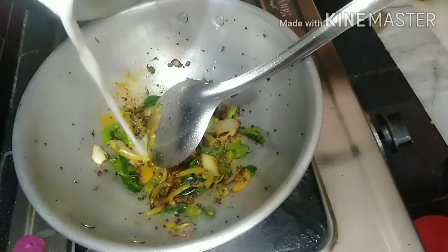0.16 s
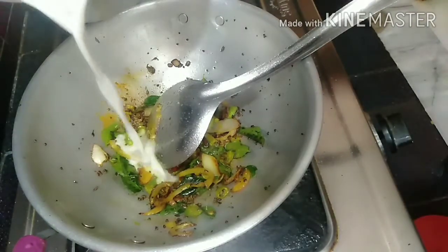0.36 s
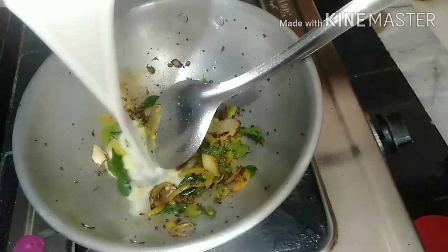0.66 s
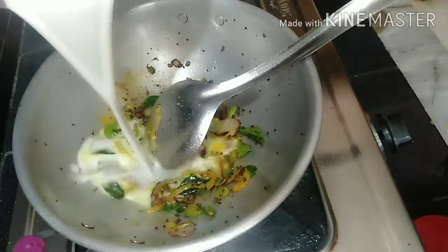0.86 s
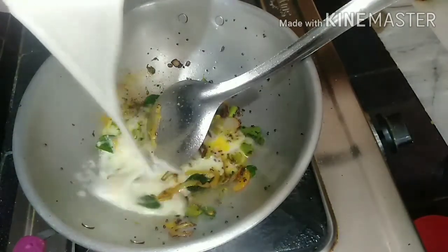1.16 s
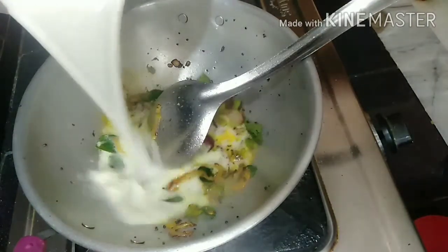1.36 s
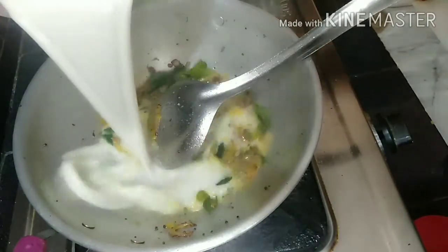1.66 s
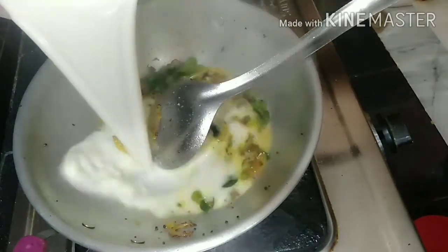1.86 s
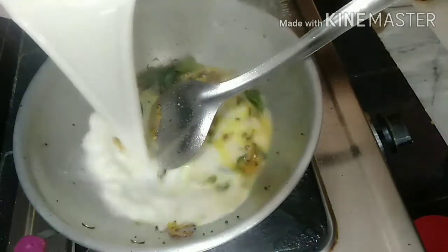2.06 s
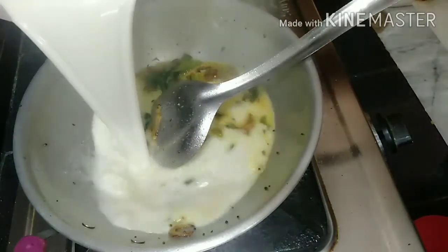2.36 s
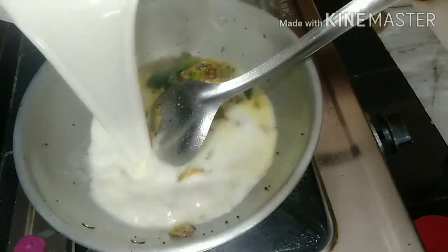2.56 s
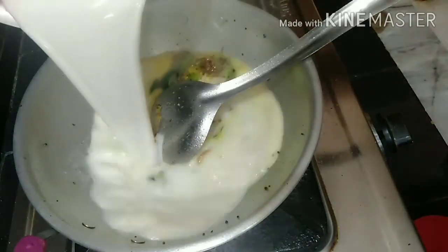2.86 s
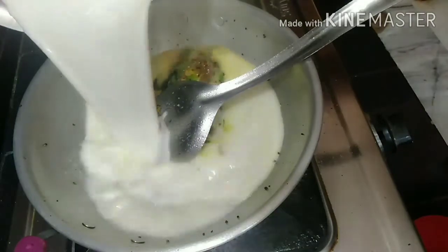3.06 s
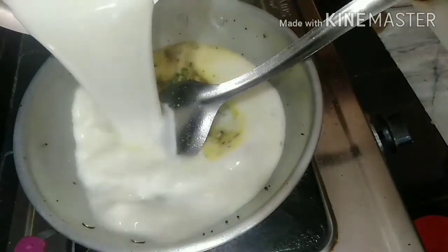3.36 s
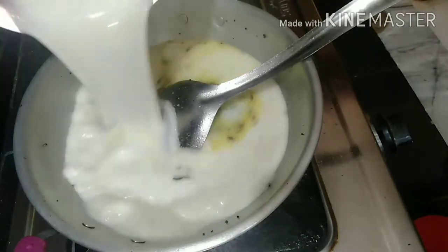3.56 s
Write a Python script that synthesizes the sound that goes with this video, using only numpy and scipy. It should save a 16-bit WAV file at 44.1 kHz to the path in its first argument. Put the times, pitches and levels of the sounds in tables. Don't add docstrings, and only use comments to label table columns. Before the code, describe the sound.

A sharp steamy hiss bursts up in a metal pan, gurgles, then fades into spitting drops

```python
import sys
import numpy as np
from scipy import signal
from scipy.fft import rfft, irfft
from scipy.io import wavfile
from scipy.ndimage import uniform_filter1d

SR = 44100
rng = np.random.default_rng(int(sys.argv[2]) if len(sys.argv) > 2 else 0)


def boost_factor(decibels):
    exponent = np.asarray(decibels, float) / 20
    return 10 ** exponent


def transcribe(signal):
    frames = np.atleast_2d(signal).T
    limited = np.clip(frames, -1, 1)
    pcm = np.round(limited * 32767).astype(np.int16)
    wavfile.write(sys.argv[1], SR, pcm)


N = 163170


def walk(rate_hz):
    hold = int(SR / rate_hz)
    steps = np.repeat(rng.standard_normal(N // hold + 1), hold)
    return 0.64 * uniform_filter1d(uniform_filter1d(steps, hold), hold)[:N]


def unit(x):
    return x / np.sqrt(np.mean(x ** 2))


def swell(t, centre_s, length_s):
    return np.exp(-2 * ((t - centre_s) / length_s) ** 2)


def colour(x, spectrum, rings=()):
    size = 4096
    f = np.maximum(np.arange(size // 2 + 1) * SR / size, 1.)
    hz, level_db = np.array(spectrum).T
    db = np.interp(np.log(f), np.log(hz), level_db)
    for ring_hz, width_hz, lift_db in rings:
        db = db + lift_db / (1 + (2 * (f - ring_hz) / width_hz) ** 2)
    cepstrum = irfft(np.log(boost_factor(db)))
    fold = np.r_[1, 2 * np.ones(size // 2 - 1), 1, np.zeros(size // 2 - 1)]
    h = irfft(np.exp(rfft(cepstrum * fold)))
    return signal.fftconvolve(x, h / np.sqrt(np.sum(h ** 2)))[:N]


# (frequency [Hz], density [dB per Hz])
ROAR = [(25, -6.5), (55, -18.5), (150, -10), (280, -20), (420, -11.5), (650, -6.5), (1100, -18),
        (4000, -33.5)]


def burner_roar(t):
    level_db = -59.5 + walk(6.6) - .5 * t
    humps = [(659.5, 38, 6.2), (594, 72, 0.67), (110, 20, 6.2)]  # Hz, width Hz, lift dB
    return boost_factor(level_db) * colour(rng.standard_normal(N), ROAR, humps)


# (time [s], frequency [Hz], length [s], level [dB])
DRONES = [(0, 100, .15, -64), (0.327, 100, 0.22, -66.5), (0.597, 100, 0.079, -71), (.8, 100, 0.23, -73),
          (1.486, 100.6, .3, -64), (1.9, 100, 0.13, -72), (2.398, 101.2, 0.22, -61),
          (2.692, 98, 0.046, -65), (0.157, 122.4, 0.36, -66.5), (0.577, 121, 0.085, -66),
          (.85, 118.9, 0.28, -68.5), (1.206, 118, 0.081, -65), (1.646, 120.5, 0.19, -68.5),
          (2.398, 120.2, 0.14, -65), (3.3, 126.2, 0.22, -67), (3.494, 118.7, 0.25, -64.5)]


def motor_drones(t):
    out = np.zeros(N)
    for s, hz, length_s, db in DRONES:
        phase = 2 * np.pi * np.cumsum(hz * (1 + 0.014 * walk(24))) / SR
        out += boost_factor(db + 1.5) * swell(t, s, length_s) * np.sin(phase)
    return out


def mode(t, hz, width_hz, curve):
    pole = np.exp((2j * np.pi * hz - np.pi * width_hz) / SR)
    ring = signal.lfilter([1], [1, -pole], rng.standard_normal(N)).imag
    return unit(ring) * boost_factor(np.interp(t, *np.array(curve).T))


# (time [s], level [dB])
FLAME = [(0, -74), (.18, -67), (.3, -70), (.45, -65), (.6, -70), (1.0, -69), (1.5, -70), (1.8, -80),
         (3.7, -80)]


def flame_note(t):
    return mode(t, 665, 45, FLAME)


# (time [s], level [dB])
WALL = [(.3, -95), (.9, -75), (1.3, -72), (1.7, -69), (2.6, -69), (3.0, -74), (3.2, -88)]


def wall_mode(t):
    return mode(t, 986, 14, WALL)


# (time [s], peak level [dB], ring frequency [Hz])
CRACKS = [(.1752, -50, 4300), (3.1375, -39, 2600), (3.138, -40, 4600), (3.1385, -43, 1700),
          (3.197, -43, 2900), (3.2209, -43, 3000), (3.239, -43, 4800), (3.2793, -39, 2900),
          (3.3317, -42, 3000), (3.3896, -42, 2400), (3.4135, -41, 3000), (3.4444, -45, 2100),
          (3.4725, -42, 3000), (3.4735, -46, 4400), (3.5, -41, 3100), (3.501, -42, 4700),
          (3.512, -46, 2000), (3.5535, -45, 3200), (3.5608, -39, 2800), (3.5612, -43, 4500),
          (3.568, -45, 1650), (3.577, -44, 2900), (3.581, -45, 3100)]


def cracks():
    t60_s = .01
    k = np.arange(int(2 * t60_s * SR)) / SR
    rings, clicks = np.zeros((2, N + len(k)))
    for s, db, hz in CRACKS:
        i = int(s * SR)
        decay = boost_factor(db - 4 - 60 * k / t60_s)
        rings[i:i + len(k)] += decay * np.sin(2 * np.pi * hz * k * (1 + 8 * k))
        clicks[i] = boost_factor(db + 4)
    return rings[:N] + colour(clicks[:N], [(700, -20), (1500, 0), (5000, 0), (7000, -15)])


# (time [s], peak level [dB], airy share [dB], flurry length [ms])
SPITS = [(.0088, -40, -2, 1.5), (.1751, -33, 3, 1.3), (.2033, -33, 5, 2), (.216, -31, 5, 2),
         (.2243, -33, 4, 4), (2.822, -28, 0, 3), (2.836, -25, 2, .8), (2.895, -27, 2, 1),
         (2.958, -29, 2, 1), (3.103, -33, 3, 3), (3.123, -27, 2, 2), (3.1375, -23, -1, 1),
         (3.157, -31, 3, 4), (3.226, -33, 3, 3), (3.239, -31, 2, 3), (3.26, -32, 3, 2), (3.28, -28, 0, 1),
         (3.333, -32, -2, 1), (3.39, -26, 2, 1.5), (3.4127, -31, 2, 1.2), (3.4145, -32, 0, 1.2),
         (3.43, -34, 8, 1), (3.434, -32, 0, 1), (3.4452, -36, 0, 3), (3.4485, -34, 0, 1.5),
         (3.473, -31, 0, 2), (3.5003, -31, -5, 3), (3.511, -35, 2, 1.5), (3.5145, -33, 0, 4),
         (3.554, -32, 2, .4), (3.561, -35, -10, 2), (3.581, -39, -5, 2), (3.618, -35, 9, 1.5)]
# (frequency [Hz], density [dB per Hz])
CRACK = [(500, -28), (1200, -14), (2800, 4), (5000, -7), (6500, -40), (9000, 21)]


def spits():
    low_db, after_db, gain_db = -7, -5, 2
    k = np.arange(int(0.016 * SR)) / SR
    drive = np.zeros((3, N + len(k)))
    for s, db, air_db, ms in SPITS:
        grain, chance = rng.standard_normal((2, len(k)))
        sparse = 0.21 + (chance > 1.7)
        spray = boost_factor(after_db) * np.clip(grain, -1.5, 1.5) * sparse * np.exp(-k * 1000 / ms)
        spray[0] = 1
        share = boost_factor(np.array([[low_db - air_db], [0], [air_db - 4.5]]))
        share = share / np.sqrt(np.mean(share ** 2))
        i = int(s * SR)
        drive[:, i:i + len(k)] += spray * boost_factor(db + gain_db) * share
    low, body, air = drive[:, :N]
    return colour(low, CRACK, RINGS) + colour(body, BODY, RINGS) + colour(air, AIR)


def bursts(rate_per_s, spread_db):
    hot, cool, cools_s, biggest = 0.71, .45, 2.9, 3.9
    chance, sign, size = rng.random((3, N))
    cooling = 1 / (1 + np.exp((cools_s - np.arange(N) / SR) / 0.49))
    hiss = np.clip(hot + (cool - hot) * cooling, 0, 1)
    heights = boost_factor(np.minimum(-np.log(size + 1e-9), biggest) * spread_db)
    pops = (chance < rate_per_s / SR) * np.sign(sign - .5) * heights
    return np.sqrt(1 - hiss) * unit(pops) + np.sqrt(hiss) * rng.standard_normal(N)


def own_flutter():
    return 0.43 * (0.2 * walk(11) + walk(60))


# (time [s], gain [dB], length [s])
SWELLS = [
    (0.623, -1.5, .05),
    (1.0, -0.5, .06),
    (1.197, 0, .15),
    (1.457, 4, 0.026),
    (1.603, 0, .05),
    (2.13, -1, 0.086),
    (3.57, 5, 0.023),
]
# (frequency [Hz], density [dB per Hz])
GURGLE = [(400, -24.5), (700, -7.5), (1200, -13.5), (1550, -7), (2200, -8.5), (3000, -5.5), (4200, -8.5),
          (6000, -27.5)]
# (frequency [Hz], width [Hz], lift [dB])
SHALLOW = [(1960, 350, 3.5), (1630, 150, 2.5), (2700, 460, 0), (726, 180, -1.5)]
DEEP = [(887, 22, 5), (1090, 180, -5), (2360, 270, 3), (1990, 200, -4)]


def gurgle(t, level_db, share_db, full):
    share_db = share_db + sum(db * swell(t, s, length_s) for s, db, length_s in SWELLS)
    bubbles = bursts(2000, 3) * boost_factor(level_db + share_db + own_flutter())
    shallow = colour(bubbles * (1 - full), GURGLE, RINGS + SHALLOW)
    return shallow + colour(bubbles * full, GURGLE, RINGS + DEEP)


# (time [s], level [dB], brightness [dB], bubble share [dB])
BOIL = [(0, -60, -13, -4), (.176, -62, -3, -6.5), (.197, -59, -3, -6), (.203, -49.5, 3, -28),
        (.235, -46, 1.5, -30), (.262, -48, -6, -22), (.32, -51, -12, -9.5), (.4, -45.5, -4, -11.5),
        (.48, -39, -6, -12), (.6, -37, -6, -14), (.9, -36, -6, -11.5), (1.2, -36.5, -2, -7),
        (1.6, -36.5, -4, -9.5), (2.1, -39, -3, -8.5), (2.5, -42, -1, -9.5), (2.8, -41.5, -3.5, -11),
        (3.0, -47, -3, -10), (3.2, -49, -3, -10), (3.55, -55, -9, -6.5), (3.7, -59, 3, -13)]
# (time [s], gain [dB], length [s])
SURGES = [(0.543, -1.5, .02), (0.567, 2, 0.016), (.62, 2.5, 0.031), (0.683, -1.5, 0.022),
          (0.873, 0.5, 0.047), (0.958, 1.5, 0.032), (1.117, -2, 0.052), (1.212, 0.5, 0.052),
          (1.405, -1.5, 0.035), (1.454, 0.5, 0.013), (1.595, 2, 0.049), (1.668, -2, 0.065),
          (1.757, 0.5, 0.025), (1.835, -1.5, 0.027), (1.882, 1.5, .03), (1.995, -7, 0.009),
          (2.117, 2, 0.073), (2.193, -2, 0.015), (2.338, 2, 0.044), (2.41, -0.5, .03), (2.582, 1, 0.11),
          (2.67, -1.5, 0.034), (2.835, 1.5, 0.019), (2.86, -3.5, 0.035), (3.056, 1.5, 0.052),
          (3.132, 3.5, 0.014), (3.18, -2, 0.05), (3.25, 0.5, 0.036), (3.352, 0, 0.023), (3.572, 2, 0.024)]
# (frequency [Hz], density [dB per Hz])
BODY = [(500, -38.5), (1200, -27.5), (3500, -19), (5600, -14.5), (6300, -7), (7700, -3.5), (8600, -9.5),
        (11000, -14)]
AIR = [(5000, -33), (8500, -7.5), (10800, -9.5), (12000, -4), (13500, -6), (14600, 4), (15450, 5.5),
       (16000, -5.5)]
# (frequency [Hz], width [Hz], lift [dB])
RINGS = [(1690, 180, 3.5), (1930, 240, 5), (2260, 200, -2.5), (2620, 300, 3.5), (3250, 140, -4),
         (3780, 300, -6.5), (4150, 250, 2), (5350, 200, 2), (5950, 200, -3), (6400, 300, 2), (6800, 300, 3),
         (7200, 400, 2.5), (8850, 300, -2), (985, 45, 3)]
FILLED = [(6880, 240, 3), (7600, 640, -4), (4630, 850, 5), (6230, 400, -5)]


def sizzle(t):
    times, *curves = np.array(BOIL).T
    level_db, bright_db, share_db = (np.interp(t, times, curve) for curve in curves)
    level_db = level_db + sum(db * swell(t, s, length_s) for s, db, length_s in SURGES)
    level_db = level_db + 0.089 * walk(30.8) + 0.47 * walk(80) + 0.92 * walk(250)
    full = 1 / (1 + np.exp((1.52 - t) / 0.46))
    fine = bursts(5000, 4.5)
    drive = fine * boost_factor(level_db + own_flutter())
    body = colour(drive * (1 - full), BODY, RINGS) + colour(drive * full, BODY, RINGS + FILLED)
    spray = unit(fine + 0.69 * rng.standard_normal(N))
    air = colour(spray * boost_factor(level_db + bright_db + own_flutter()), AIR, [(15460, 60, 3)])
    return boost_factor(1.8) * body + boost_factor(3.0) * air + boost_factor(-0.96) * gurgle(t, level_db, share_db, full)


def patches(x):
    size, depth_db, patch_hz, patch_s = 256, 1.5, 500, .03
    z = signal.stft(x, nperseg=size)[2]
    field = rng.standard_normal(z.shape)
    for width, axis in ((patch_hz * size / SR, 0), (2 * patch_s * SR / size, 1)):
        width = max(int(width), 1)
        field = uniform_filter1d(uniform_filter1d(field, width, axis), width, axis)
    return signal.istft(z * boost_factor(depth_db * unit(field)), nperseg=size)[1][:N]


def walls(x):
    t60_s, wet_db = .12, -13
    k = np.arange(int(.2 * SR)) / SR
    h = rng.standard_normal(len(k)) * boost_factor(-60 * k / t60_s) * (k > .001)
    return x + boost_factor(wet_db) * signal.fftconvolve(x, h / np.sqrt(np.sum(h ** 2)))[:N]


def scene():
    t = np.arange(N) / SR
    pan = walls(patches(sizzle(t)) + spits() + cracks())
    kitchen = burner_roar(t) + motor_drones(t) + flame_note(t) + wall_mode(t)
    mono = pan + kitchen
    return np.array([mono, mono])


def top_cut(x):
    return signal.sosfilt(signal.butter(12, 15740, fs=SR, output="sos"), x)


def record(dry):
    top_hz = 15500
    f = np.arange(N // 2 + 1) * SR / N
    cut = np.clip((top_hz + 60 - f) / 100, 0, 1) ** 2
    mix = irfft(rfft(dry) * cut, N)
    return top_cut(mix)


dry = scene()
out = record(dry)
transcribe(out)
```